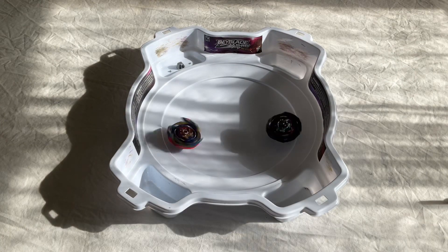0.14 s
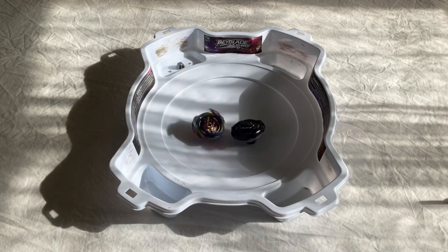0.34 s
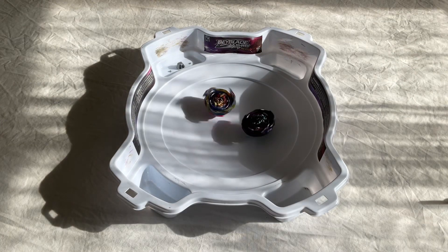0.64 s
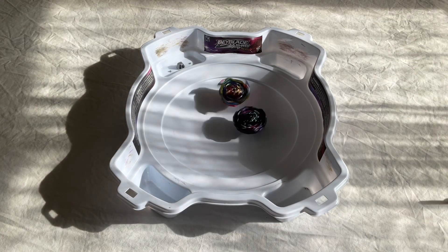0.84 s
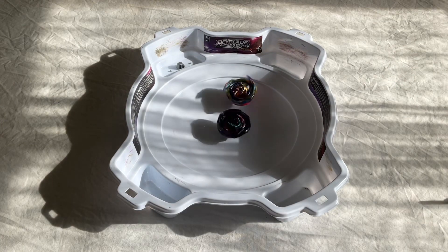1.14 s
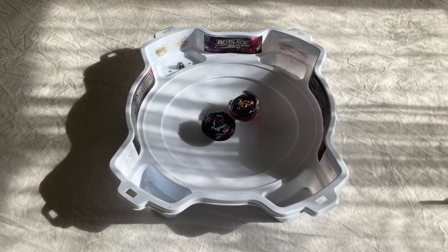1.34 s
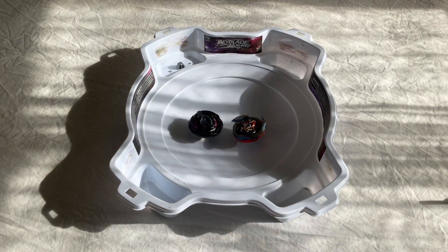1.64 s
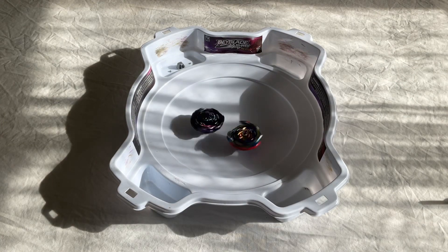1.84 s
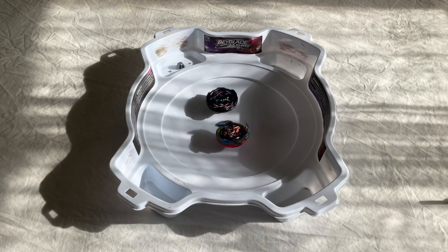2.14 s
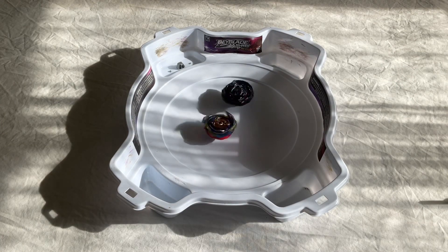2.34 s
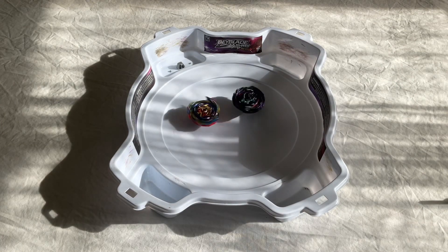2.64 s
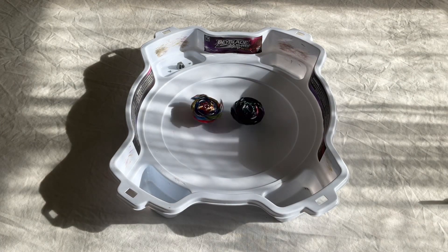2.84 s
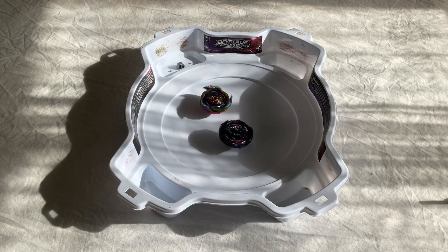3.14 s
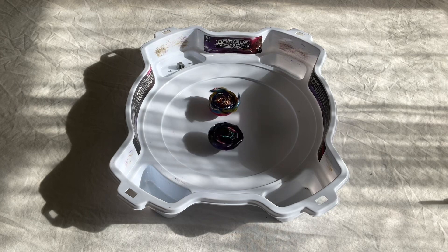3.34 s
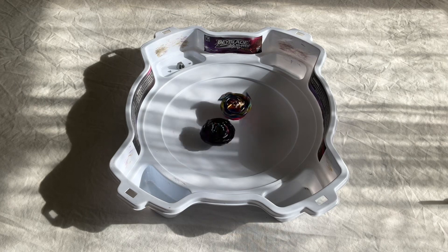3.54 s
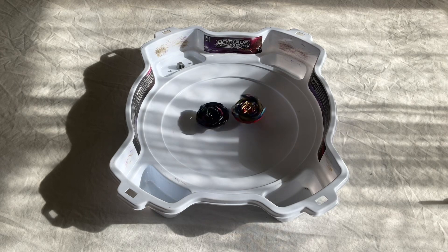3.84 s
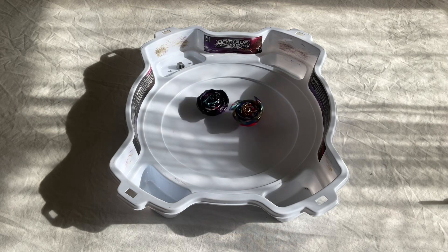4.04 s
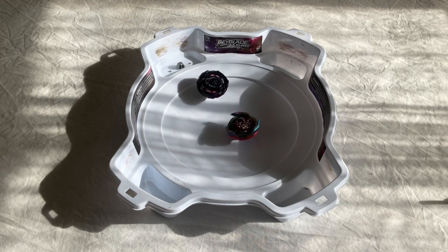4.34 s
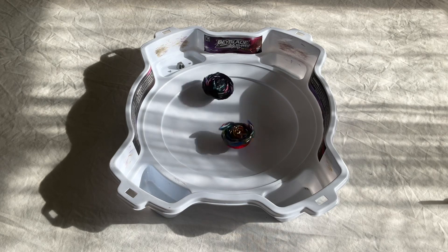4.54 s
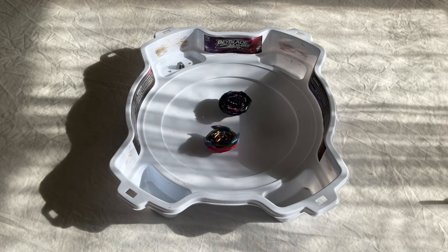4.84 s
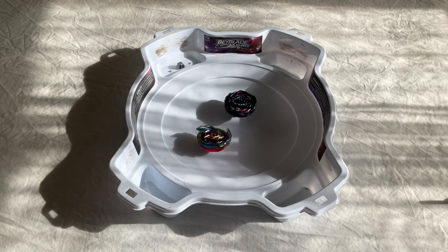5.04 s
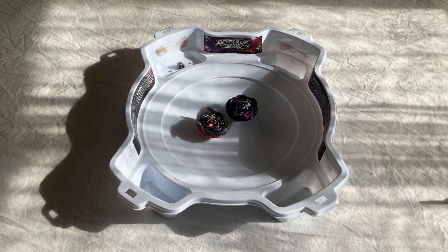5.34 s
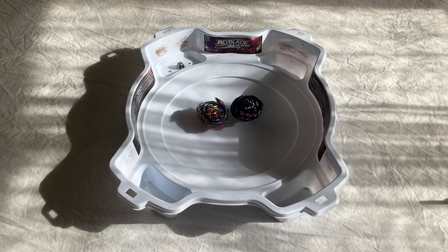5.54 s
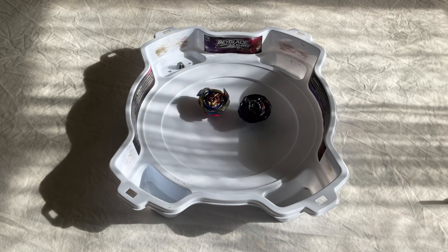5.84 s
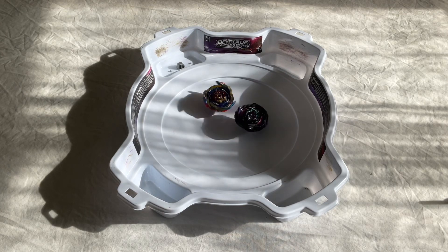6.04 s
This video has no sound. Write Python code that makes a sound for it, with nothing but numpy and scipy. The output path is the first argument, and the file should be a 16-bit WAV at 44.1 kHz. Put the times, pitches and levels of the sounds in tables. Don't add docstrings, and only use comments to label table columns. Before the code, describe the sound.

Hard plastic-and-metal clacks burst between gritty rubbing and faint ticks as two tops spin, their low buzz humming through a hollow plastic bowl.

```python
import sys
import numpy as np
from scipy import signal
from scipy.fft import rfft, irfft
from scipy.io import wavfile
from scipy.ndimage import uniform_filter1d

SR = 44100
rng = np.random.default_rng(int(sys.argv[2]) if len(sys.argv) > 2 else 0)


def unload_audio(sound):
    columns = np.transpose(np.atleast_2d(sound))
    steps = np.round(np.clip(columns, -1, 1) * 32767)
    wavfile.write(sys.argv[1], SR, steps.astype(np.int16))


def how_loud(loudness_db):
    steps = np.asarray(loudness_db, float) / 20
    return 10 ** steps


N = 273420

# start_s, contact_ms, shell_db, ring_db, thud_db
BLOWS = [(0.3472, 1.35, -16.5, -10.5, -24.5), (0.8077, 1.7, -25, -17.5, -29.5),
         (1.2616, 2.5, -28, -23, -32), (2.0124, 2.4, -23, -18.5, -31.5), (2.9578, 1.96, -21.5, -17, -26),
         (3.9306, 2.3, -27.5, -26.5, -34), (4.1835, 1.85, -20, -18, -24),
         (4.7722, 2.5, -14.5, -11.5, -24.5), (5.3224, 1.42, -15.5, -16, -17.5),
         (5.3868, 1.7, -23, -20, -31), (5.5838, 1.88, -22, -20, -25), (6.0253, 2.23, -26, -19, -27)]
# start_s, contact_ms, shell_db, ring_db
GLANCES = [(0.2739, 1.6, -29.5, -34), (0.4056, 2.1, -21.5, -34.5), (0.8186, 1.9, -22.5, -19.5),
           (1.2751, 0.9, -26, -38), (2.0548, 1.5, -31.5, -34.5), (2.0955, 1.78, -35, -32),
           (2.1167, 0.85, -23, -31.5), (2.1466, 2.2, -30, -35), (2.9423, 3.7, -36, -32.5),
           (2.9832, 1.1, -32, -55), (3.0346, 1.56, -27, -35), (3.9829, .83, -25.5, -29),
           (4.7305, 1.8, -27.5, -32), (4.7632, 2.1, -31.5, -41.5), (5.3434, 3.8, -30.5, -25),
           (6.0158, 1.4, -25.5, -23), (6.1021, .53, -26, -30), (6.1271, 0.8, -26, -29.5)]
# start_s, shell_db, ring_db
TICKS = [(0.7786, -33.5, -39), (.9439, -58, -52), (1.11, -57, -44), (1.153, -59, -53),
         (1.4087, -36.5, -45.5), (1.529, -46, -62), (1.8275, -44.5, -66), (1.8586, -47, -68),
         (1.975, -41.5, -52), (2.081, -35, -55), (2.1605, -30, -33), (4.571, -41, -50), (2.8255, -43, -46),
         (3.1138, -37, -54), (3.1232, -37.5, -51.5), (3.6271, -46.5, -57), (3.7136, -45.5, -59),
         (3.727, -45.5, -62), (3.893, -40, -41.5), (3.973, -47, -35), (4.4692, -40.5, -47),
         (4.4908, -49, -56), (4.599, -39, -47), (4.636, -33, -44), (4.748, -41, -50), (4.855, -32.5, -37),
         (4.914, -47, -52.5), (5.1611, -44.5, -54), (5.6321, -32.5, -39), (5.996, -37, -52)]
# first_s, last_s, brushes (count), first_db, last_db
BRUSH_TRAINS = [(0.043, .188, 4, -44, -46), (.204, .2607, 3, -43, -30.5), (.4567, .5455, 4, -32.5, -30.5),
                (0.609, .7618, 4, -41, -57.5), (0.626, .7212, 3, -42, -36.5), (0.981, 1.1434, 4, -50, -49),
                (1.512, 1.5614, 3, -56, -60), (2.222, 2.3, 4, -38, -39), (2.313, 2.3741, 3, -45, -45),
                (2.48, 2.635, 4, -51.5, -58), (2.662, 2.769, 3, -63.5, -51), (2.796, 2.8151, 2, -50, -54),
                (2.8623, 2.9159, 3, -36, -45), (3.195, 3.3075, 3, -50.5, -53),
                (3.4725, 3.6458, 4, -56.5, -53.5), (3.8267, 3.885, 3, -44, -38),
                (4.07, 4.1237, 2, -43, -53), (4.406, 4.4394, 3, -42, -48.5), (4.508, 4.554, 3, -45, -40.5),
                (5.021, 5.0974, 2, -68, -56), (5.483, 5.496, 2, -50.5, -45), (5.69, 5.734, 3, -45.5, -48),
                (5.8433, 5.8821, 3, -40.5, -49), (5.7973, 5.9423, 2, -52, -46)]
# pitch_hz, width_hz, level_db
SHELL_MODES = [(1238, 446, 0.5), (1603, 310, 1), (2040, 394, -0.5), (2595, 180, 1.5), (2853, 260, 1.5),
               (3380, 290, 1.5), (3775, 460, -3)]
# pitch_hz, width_hz, level_db
CORE_MODES = [(4100, 840, -6), (4820, 200, 0), (5050, 260, -2.5), (6050, 990, -7.5)]
# pitch_hz, width_hz, level_db
RING_MODES = [(6350, 760, 0.5), (7240, 440, 3.5), (8280, 860, 2.5), (8580, 39, 6), (9070, 1100, -9),
              (11190, 520, -2), (11200, 390, -2.5), (16900, 10000, -14.5)]
# pitch_hz, width_hz, level_db
THUD_MODES = [(148, 33, -4), (190, 23, -2.5), (345, 230, 0), (453, 60, -4.5), (610, 180, -12),
              (780, 150, -13)]
# start_s, pitch_hz, level_db, t60_s
RING_SINGS = [
    (.815, 5345, -55.5, 1.5),
]
# start_s, pitch_hz, level_db, t60_s
LATCH_PINGS = [
    (1.109, 5050, -35.5, 0.013),
    (1.1524, 5050, -26, 0.01),
    (3.352, 5000, -50, .06),
]
# start_s, firmest_s, end_s, shell_db, core_share_db
LEANS = [(0.0, -0.005, 0.69, -57.5, -14), (0.117, 0.219, 1.2, -49.5, -13), (0.295, 0.353, 0.84, -34, -3),
         (.55, 0.775, 1.6, -54, -10), (0.782, 0.826, 1.023, -42, 2), (0.949, 1.247, 1.1, -58, -3),
         (1.236, 1.274, 1.507, -40, 0.5), (1.821, 1.903, 2.13, -63, -6.5), (1.995, 2.041, 2.45, -37, -6),
         (2.91, 2.957, 3.264, -38.5, -1.5), (3.448, 3.92, 4.32, -58, -6.5),
         (3.906, 3.957, 4.176, -41.5, -4.5), (4.175, 4.2, 4.53, -43.5, 2), (3.32, 3.369, 3.38, -68, 6),
         (4.403, 4.607, 4.65, -61, -14), (4.74, 4.792, 4.97, -46.5, 1.5), (5.78, 5.86, 6.1, -64.5, -12),
         (5.153, 5.175, 5.26, -61.5, -24), (5.299, 5.345, 5.55, -37.5, -5), (5.578, 5.6, 5.737, -40, 0),
         (5.959, 6.03, 6.4, -38, -10.5), (6.0, 6.183, 6.3, -41.5, -7.5)]
# start_s, firmest_s, end_s, shell_db, core_share_db
SLIDES = [
    (0.185, 0.308, .42, -39.5, -8),
    (.36, .45, 0.63, -41.5, -7.5),
    (2.03, 2.16, 2.38, -45, -8),
    (1.816, 1.848, 2, -62.5, -7),
    (2.788, 2.875, 2.95, -49, -10),
    (3.0, 3.08, 3.19, -48, -7),
    (4.186, 4.287, 4.427, -38, 6),
    (4.577, 4.66, 4.9, -35.5, 1.5),
    (5.39, 5.414, 5.48, -48, -0.5),
    (5.599, 5.627, 5.7, -45.5, -4),
]
# start_s, pitch_hz, level_db
PANEL_KNOCKS = [(.347, 556, -24.5), (.351, 330, -20), (0.357, 171.6, -29), (0.39, 131, -19),
                (0.423, 342, -25), (0.428, 140, -21), (.81, 758, -27.5), (.839, 721, -30),
                (1.264, 1344, -33), (2.198, 171.6, -24), (2.957, 1140, -35.5), (4.25, 770, -34),
                (4.64, 780, -32), (2.855, 1190, -39), (2.89, 1190, -35), (3.891, 1200, -39.5),
                (5.63, 1195, -30), (4.769, 1063, -35), (4.775, 330, -19.5), (5.322, 1120, -31),
                (5.321, 450.5, -23.5), (5.326, 200, -20.5), (5.345, 1060, -30), (5.585, 1217, -24),
                (5.586, 212, -25), (6.02, 1270, -29), (6.026, 327, -24)]
# time_s, turns_hz, hum_db
SPIN = [(0.0, 76.4, -37), (0.17, 78, -69), (0.21, 76.9, -34), (0.26, 77.5, -54), (1.12, 77.4, -54),
        (1.64, 76.1, -40.5), (3.12, 76.1, -39.5), (3.28, 75.5, -46), (3.61, 76.06, -41.5),
        (4.02, 75.5, -48.5), (4.14, 76.7, -45), (4.3, 76.0, -56), (4.47, 76.4, -42.5), (4.71, 75.8, -52.5),
        (4.97, 76.2, -35.5), (5.37, 76.27, -46.5), (5.97, 76.5, -39), (6.2, 76.3, -46)]
# pitch_hz, width_hz, level_db
BOWL_MODES = [(90.4, 29, 1.5), (143, 29.3, -0.5), (187, 26, -0.5), (229, 44, -2), (305, 64, -3.5),
              (445, 114, -6.5), (579, 210, -11), (702, 110, -8.5), (953, 920, -17.5)]
# pitch_hz, level_db
AIR_COLOUR = [(20, -40), (45, -6), (90, 2.5), (600, -29), (2100, -29.5), (3500, -54), (7000, -45.5),
              (14000, -75)]
# start_s, end_s
SMOOTH_SLIDE_S = (4.2, 4.76)
# shell_db, core_db, ring_db
REST_DB = (-71.5, -75.5, -81.5)

CORE_DB, THUD_DB = -8, -8.5
BRUSH_MS, BRUSH_RING_DB, BRUSH_SCATTER_DB = 0.87, -9, 2.5
RING_DB, RING_WITH_CORE = 0, 0.58
SLIDE_ROUNDING = 2.33
PANEL_T60_S = 0.054
RUMBLE_DB, RUMBLE_FADE_DB_S, RUMBLE_PER_DB = -46.5, -0.75, 0.195
FLOOR_DB, FLOOR_FADE_DB_S, FLOOR_PRESSED_DB = -38.5, -6, -4.5
ROOM_T60_S, ROOM_DB, ROOM_HZ = 0.17, -15.5, 7230
AIR_DB = -49
TOP_HZ = 15850


def clashes():
    t = np.arange(2500) / SR
    drive = np.zeros((4, N + len(t)))
    for start_s, contact_ms, *parts_db in contacts():
        u = t / (max(contact_ms, .2) / 1000)
        scrape = (u * np.exp(1 - u)) ** 2
        rattle = how_loud(-11.5) * np.exp(-t / 0.014) * (1 - np.exp(-u))
        i = max(int((start_s - .0005) * SR), 0)
        drive[:, i:i + len(t)] += np.outer(how_loud(np.array(parts_db)), scrape + rattle)
    shell, core, ring, thud = drive[:, :N]
    rims = np.zeros(N)
    for push, modes in ((shell, SHELL_MODES), (core, CORE_MODES), (ring, RING_MODES)):
        rims += how_loud(1.5) * body(push * grit(1.0), modes)
    rims = signal.lfilter(*signal.butter(2, 1700, "high", fs=SR), rims)
    skid = uniform_filter1d(np.roll(thud, int(0.0061 * SR)), 300)
    return rims + how_loud(-3.0) * body(skid * rng.standard_normal(N), THUD_MODES)


def contacts():
    light = GLANCES + [(start_s, BRUSH_MS, shell, ring) for start_s, shell, ring in TICKS + brushes()]
    rows = BLOWS + [(*row, row[2] + THUD_DB) for row in light]
    return [(start_s, ms, shell, (shell + ring) / 2 + CORE_DB, ring, thud)
            for start_s, ms, shell, ring, thud in rows]


def brushes():
    scatter_db = rng.standard_normal((len(BRUSH_TRAINS), 4, 2)) * BRUSH_SCATTER_DB
    out = []
    for (first_s, last_s, count, *ends_db), row in zip(BRUSH_TRAINS, scatter_db):
        times_s = np.linspace(first_s, last_s, round(count))
        levels_db = np.linspace(*ends_db, round(count))
        for start_s, db, (shell, ring) in zip(times_s, levels_db, row):
            out.append((start_s, db + shell, db + BRUSH_RING_DB + ring))
    return out


def rubbing(parts_db, turns):
    t = np.arange(N) / SR
    cycle = 1.5 * turns / (2 * np.pi) + .25 * walk(40) + 3
    force = how_loud(rng.uniform(-12, 5, size=1000))[cycle.astype(int)]
    bumps = force * np.exp(-(cycle % 1) / .2)
    smooth = (t > SMOOTH_SLIDE_S[0]) & (t < SMOOTH_SLIDE_S[1])
    rattle = np.where(smooth, .3, 2.2)
    flicker_db = np.where(smooth, 1.4, 2.5)
    throb = how_loud(1.2 * walk(90)) * (.6 + rattle * uniform_filter1d(bumps, 30))
    rub = np.zeros(N)
    for db, modes in zip(parts_db, (SHELL_MODES, CORE_MODES, RING_MODES)):
        rub += how_loud(db) * body(grit(1.7), modes, flicker_db)
    return throb * rub


def pressure(t):
    rest = np.array(REST_DB)
    out = np.outer(rest, np.ones(len(t)))
    spells = [(row, 1) for row in LEANS] + [(row, SLIDE_ROUNDING) for row in SLIDES]
    for (start_s, firm_s, end_s, shell_db, core_db), rounding in spells:
        corners_s = [start_s, max(firm_s, start_s + 1e-3), max(end_s, firm_s + 2e-3)]
        slack = np.interp(t, corners_s, [1, 0, 1])
        ring_db = shell_db + RING_DB + RING_WITH_CORE * core_db
        climb = np.array([shell_db, shell_db + core_db, ring_db]) - rest
        out = np.maximum(out, rest[:, None] + np.outer(climb, 1 - slack ** rounding))
    return out


def chimes(table, rise_s):
    out, t = np.zeros(N + SR), np.arange(SR) / SR
    for start_s, pitch_hz, level_db, t60_s in table:
        i = int(start_s * SR)
        decay = np.exp(-np.log(1000) * t / t60_s) * (1 - np.exp(-t / rise_s))
        out[i:i + SR] += how_loud(level_db) * np.sin(2 * np.pi * pitch_hz * t) * decay
    return out[:N]


def spinning(hum_db, floor_db, rumble_db, turns):
    shake = np.sin(turns) + how_loud(-26.5) * np.sin(2 * turns)
    hum = how_loud(hum_db + 1.5 * walk(8.3)) * np.sqrt(2) * shake
    floor = how_loud(floor_db - 5.5) * body(rng.standard_normal(N), [(349.0, 16, 0)])
    wobble_db = 1.3 * walk(25)
    rumble = how_loud(rumble_db + wobble_db) * body(rng.standard_normal(N), BOWL_MODES)
    return hum + floor + rumble


def body(x, modes, flicker_db=0.):
    low_hz, high_hz = 0.47 * modes[0][0], min(1.064 * modes[-1][0], .45 * SR)
    edges = signal.butter(2, [low_hz, high_hz], "band", fs=SR, output="sos")
    wander = how_loud(flicker_db * walk(45)) if np.any(flicker_db) else np.ones(N)
    click, ring = np.zeros(8192), np.zeros(N)
    for k, (hz, width_hz, db) in enumerate(modes):
        gain = (-1) ** k * how_loud(db)
        mode = signal.iirpeak(hz, hz / width_hz, SR)
        click += gain * signal.lfilter(*mode, signal.unit_impulse(8192))
        ring += gain * signal.lfilter(*mode, x * np.roll(wander, int(hz * 61)))
    return signal.sosfilt(edges, ring) / np.linalg.norm(signal.sosfilt(edges, click))


def grit(scatter_db):
    return unit_rms(rng.standard_normal(N) * how_loud(scatter_db * rng.exponential(size=N)))


def walk(rate_hz):
    k = int(SR / rate_hz)
    steps = np.repeat(rng.standard_normal(N // k + 1), k)
    return unit_rms(uniform_filter1d(uniform_filter1d(steps, k), k)[:N])


def unit_rms(x):
    return x / np.sqrt(np.mean(x ** 2))


def room(x):
    t = np.arange(SR // 2) / SR
    tail = rng.standard_normal(len(t)) * np.exp(-np.log(1000) * t / ROOM_T60_S) * (t > .006)
    tail = signal.lfilter(*signal.butter(1, ROOM_HZ, fs=SR), tail)
    return how_loud(ROOM_DB) * signal.fftconvolve(x, tail / np.linalg.norm(tail))[:N]


def air():
    log_hz = np.log(np.maximum(np.arange(N // 2 + 1) * SR / N, 1))
    curve_hz, curve_db = np.transpose(AIR_COLOUR)
    shape = how_loud(np.interp(log_hz, np.log(curve_hz), curve_db))
    return how_loud(AIR_DB) * unit_rms(irfft(rfft(rng.standard_normal(N)) * shape, N))


def scene():
    t = np.arange(N) / SR
    parts_db = [np.interp(t, t[::32], part) for part in pressure(t[::32])]
    rumble_db = RUMBLE_DB + RUMBLE_FADE_DB_S * t + RUMBLE_PER_DB * (parts_db[0] - REST_DB[0])
    floor_db = np.maximum(FLOOR_DB + FLOOR_FADE_DB_S * t, parts_db[0] + FLOOR_PRESSED_DB)
    time_s, turns_hz, hum_db = np.transpose(SPIN)
    turns = 2 * np.pi * np.cumsum(np.interp(t, time_s, turns_hz)) / SR
    hum_db = np.interp(t, time_s, hum_db)
    rims = clashes() + chimes(RING_SINGS + LATCH_PINGS, 0.00015) + rubbing(parts_db, turns)
    panels = chimes([(*knock, PANEL_T60_S) for knock in PANEL_KNOCKS], 0.0014)
    whir = spinning(hum_db, floor_db, rumble_db, turns)
    return (rims + room(rims) + panels + whir + air())[None]


def roll_off(x):
    return signal.sosfilt(signal.butter(12, 16820, fs=SR, output="sos"), x)


def record(dry):
    x = signal.sosfilt(signal.butter(2, 60, "high", fs=SR, output="sos"), dry)
    rounded = np.tanh(0.85 * x) / 0.95
    mix = signal.sosfilt(signal.ellip(6, .2, 40, TOP_HZ, fs=SR, output="sos"), rounded)
    return roll_off(mix)


dry = scene()
out = record(dry)
unload_audio(out)
```